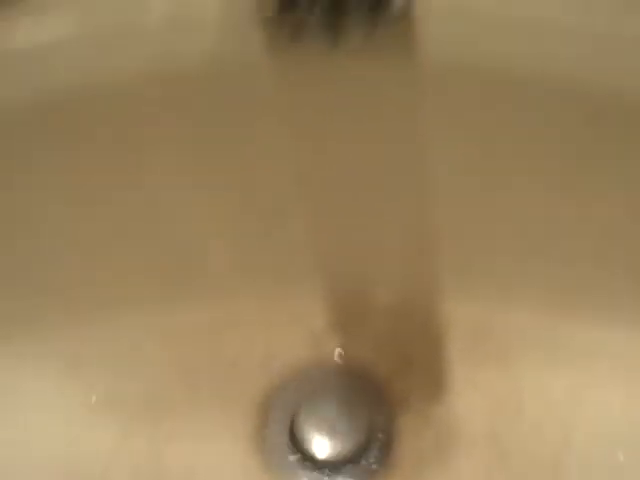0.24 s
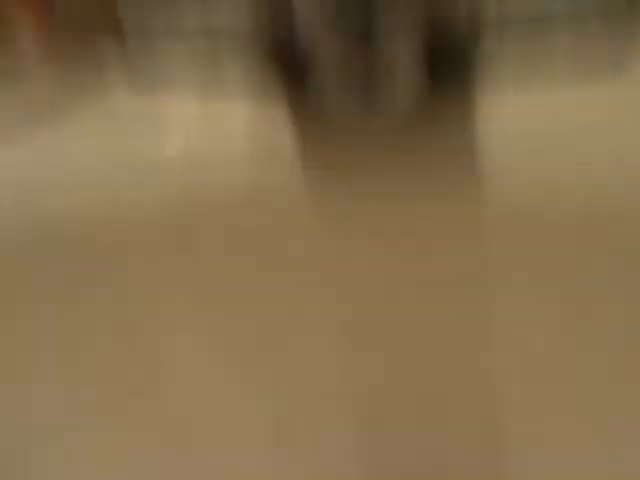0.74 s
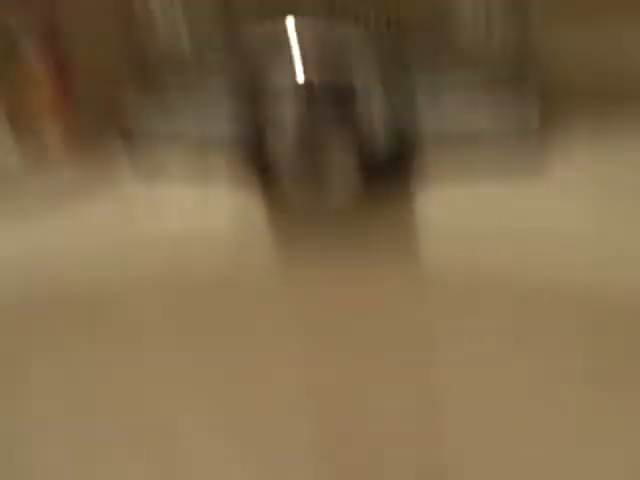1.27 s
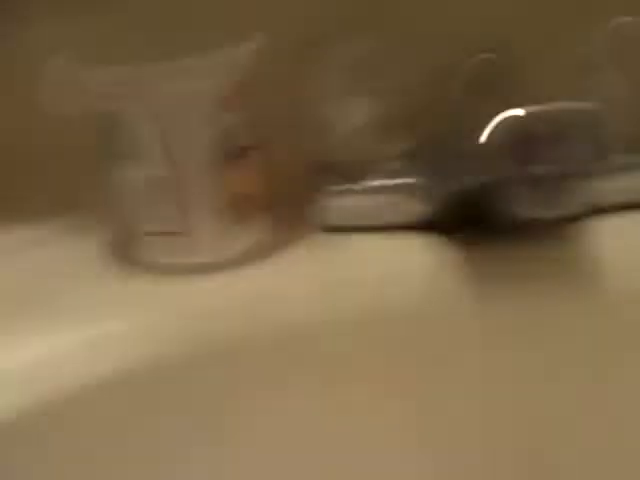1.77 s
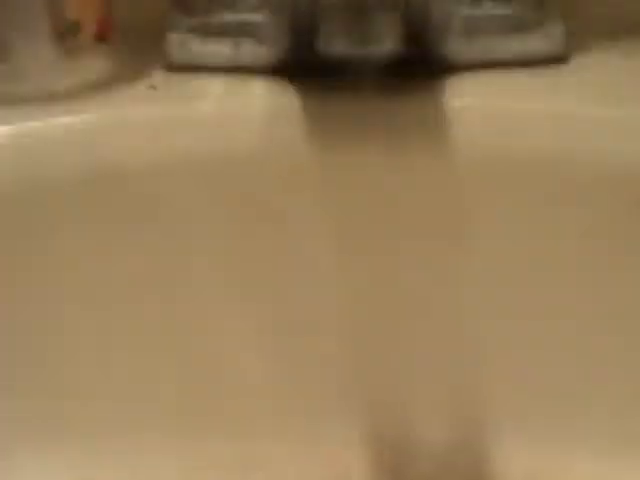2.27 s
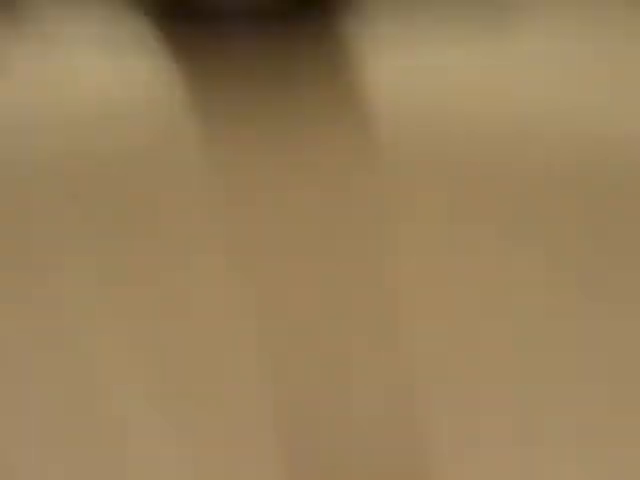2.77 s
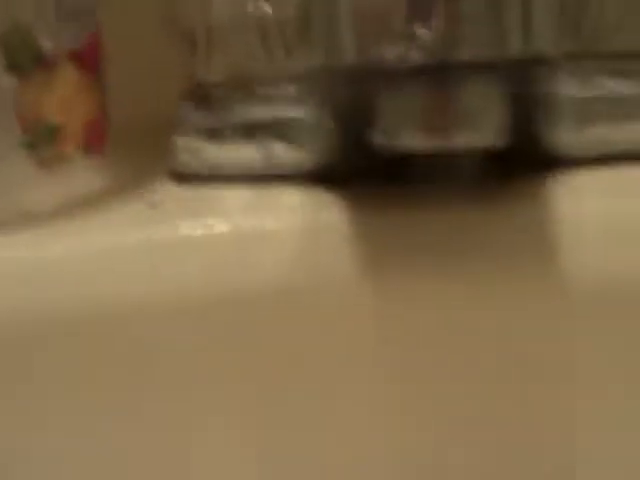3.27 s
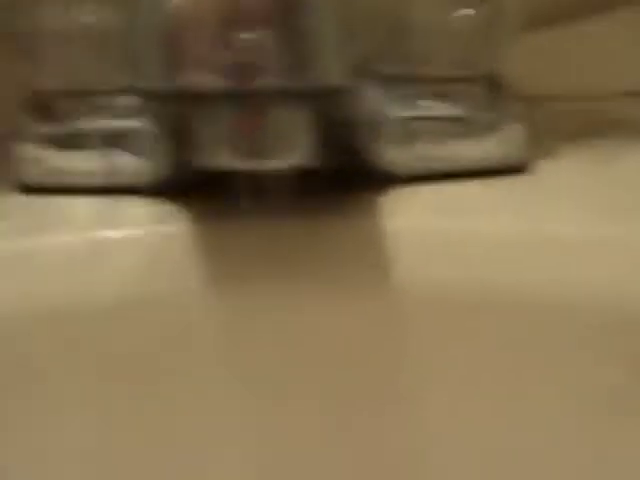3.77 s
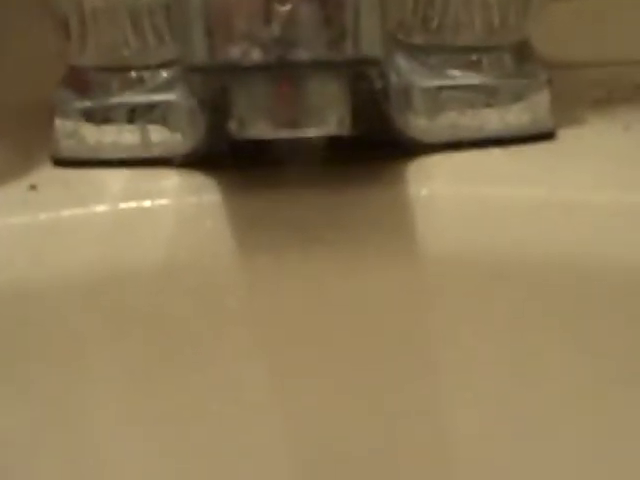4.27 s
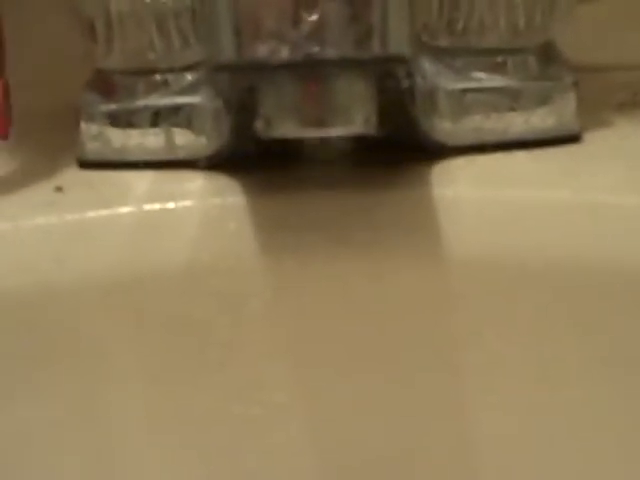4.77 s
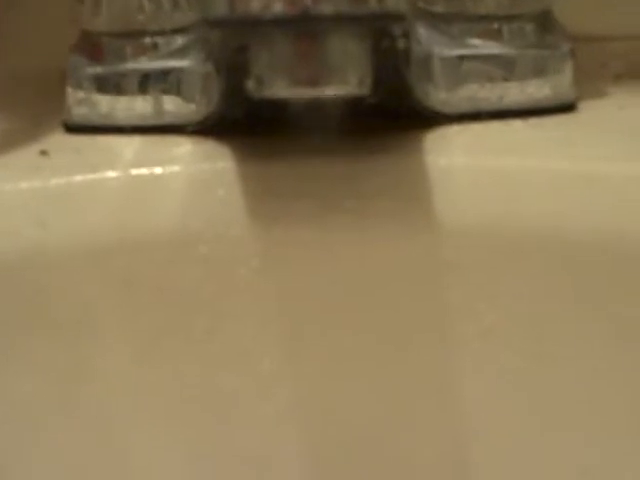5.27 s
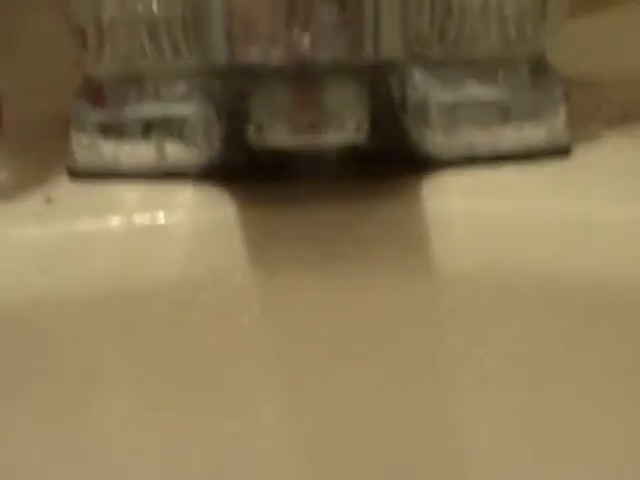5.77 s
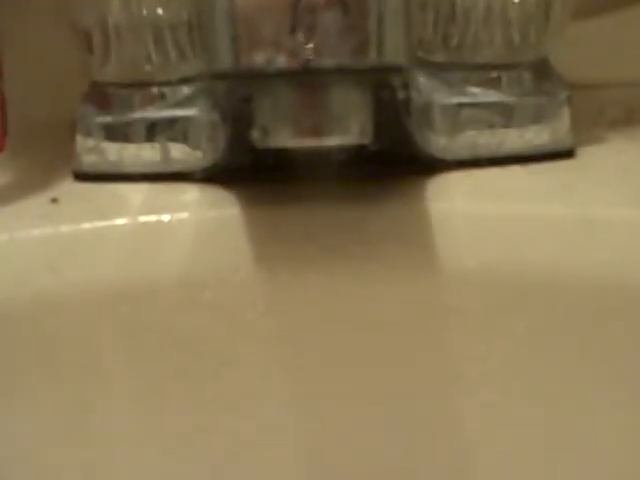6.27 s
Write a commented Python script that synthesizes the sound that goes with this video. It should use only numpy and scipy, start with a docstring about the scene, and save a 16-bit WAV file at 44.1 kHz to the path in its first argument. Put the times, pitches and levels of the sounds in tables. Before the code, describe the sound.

A bathroom tap blows air over a bare basin, close to a small hand-held microphone, for about 6.5 seconds. A loud, bright, wide hiss is already running at the start, fluttering unevenly, with a faint hollow ring like a short pipe and a thin singing from the bowl that fades by 0.8 s. Tiny slugs of water spit as sharp, very short noisy bursts, densest from 0.2 to 1.7 s. The hiss changes colour in sliding, slightly phasing sweeps as the microphone moves. Around 1.75 s it suddenly drops and dulls, then climbs back by about 2.1 s, with more spits up to 3.2 s. Soft low handling thumps occur near 1, 1.4 and 1.9 s. From about 4 s the tone holds nearly still: a smoother, steady, crisp hiss with scattered light spits, continuing to the end without stopping.

```python
"""In a bathroom, air blows out of a tap over a bare basin, close to a small hand-held camera with one microphone.
The jet is filtered noise that hisses and flutters; noise through resonance peaks makes the spout ring like a
short pipe and the bowl sing. Slugs of water spit as short noise bursts. Echoes off the tap and porcelain
draw combs that slide as the camera moves, and the hand adds a faint rumble of slow random pressure."""
import sys
import numpy as np
from scipy import signal
from scipy.fft import rfft, irfft
from scipy.io import wavfile
from scipy.ndimage import uniform_filter1d

SR = 44100
rng = np.random.default_rng(int(sys.argv[2]) if len(sys.argv) > 2 else 0)


def store_pcm(level_fs):
    """Save levels as 16-bit WAV."""
    pcm = np.round(np.clip(level_fs, -1, 1) * 32767).astype(np.int16)
    wavfile.write(sys.argv[1], SR, np.atleast_2d(pcm).T)


N = 287973

# strength and tone of the air jet: (time [s], level before flutter [dB], brightness from 1500 Hz up to 8000 Hz [dB per octave])
FLOW = [(0, -15.5, -0.5), (.3, -16.5, -.5), (.55, -16, -1.3), (1, -15, 0.5), (1.25, -16, -1.1),
        (1.73, -18.5, -0.55), (1.77, -23, -2.2), (1.91, -21.5, -1), (2.05, -18.5, -2), (2.25, -19.5, -1),
        (2.45, -18, -1.5), (2.7, -17, -0.1), (2.95, -17.5, -.6), (3.17, -17.5, 0.4), (3.25, -19.5, -.4),
        (3.55, -18.5, 0), (4.07, -17.5, -0.23), (6.53, -17.5, -0.45)]
# resonances of the air column in the spout: (pitch [Hz], width at half height [Hz], relative level [dB])
SPOUT_MODES = [(394, 97, -1), (1232, 250, 0.5), (2140, 240, -6), (3160, 270, -9.5), (3540, 81, -1)]


def amp(db):
    """Turns decibels into a factor on the sound pressure."""
    return 10 ** (np.asarray(db) / 20)


def evened(x):
    """Scales a signal to an rms of 1."""
    return x / np.sqrt(np.mean(x ** 2) + 1e-20)


def read(points, hz):
    """Reads a (pitch, value) table at any pitch, along a logarithmic pitch scale."""
    f, value = np.transpose(points)
    return np.interp(np.log(hz + 1), np.log(f + 1), value)


def columns(table, t):
    """Reads each column of a table at the times t, in straight lines between its rows."""
    s, *rest = np.transpose(table)
    return [np.interp(t, s, c) for c in rest]


def coloured(x, gain):
    """Filters x by gain(hz, t) on short-time spectra, so the colour can change with time."""
    hz, t, z = signal.stft(x, SR, nperseg=1024, noverlap=768)
    z = z * gain(hz[:, None], t)
    return signal.istft(z, SR, nperseg=1024, noverlap=768)[1][:len(x)]


def wander(lo_hz, hi_hz):
    """Random curve of rms 1 whose speed lies mostly between two rates."""
    hz = np.fft.rfftfreq(N, 1 / SR)
    shape = (hz / lo_hz) / (1 + hz / lo_hz) / (1 + (hz / hi_hz) ** 2)
    return evened(irfft(rfft(rng.standard_normal(N)) * shape, N))


def crackle(per_s, spread_db):
    """Sparse clicks of either sign, a few of them large."""
    size_db = spread_db * np.minimum(rng.exponential(1, N), 4)
    size = amp(size_db) * np.sign(rng.standard_normal(N))
    return evened(size * (rng.random(N) < per_s / SR))


def peaks(modes):
    """Makes a gain curve with one resonance peak for each mode."""
    def gain(hz, t):
        power = 0
        for f, width, db in modes:
            power = power + amp(db) ** 2 / (1 + (2 * (hz - f) / width) ** 2) ** 2
        return np.sqrt(power)
    return gain


def humps_db(table, hz):
    """Adds up smooth bell-shaped humps and dips, in decibels."""
    return sum(db * np.exp(-((hz - f) / width) ** 2 * 2) for f, width, db in table)


def jet_colour(hz, t):
    """Smooth jet spectrum, the humps of the mouth, and a tilt that follows the aim of the camera."""
    # smooth spectrum of the hiss: (pitch [Hz], relative level [dB per Hz])
    hiss = [(15, -23), (25, -13), (140, -10.5), (300, -12), (700, -12), (1600, -12), (2700, -9.5),
            (3950, -9), (5200, -3), (6800, -1.5), (8500, -1), (10600, -0.5), (12300, 0), (14000, 1.5),
            (15800, 1.5)]
    # humps and dips of the aerator and mouth of the tap: (pitch [Hz], width [Hz], height before scaling [dB])
    mouth = [(1610.0, 120.0, 1.1), (2250.0, 340.0, 1.2), (2920.0, 240.0, -1.3), (3240.0, 120.0, 0.8),
             (3960.0, 300.0, -2.9), (4380.0, 150.0, -1.8), (4970.0, 900.0, 0.8), (5380.0, 140.0, 2.4),
             (5900.0, 170.0, -1.0), (6940.0, 120.0, -2.0), (7270.0, 720.0, 1.2), (7590.0, 220.0, -2.3),
             (8450.0, 440.0, -0.9), (8810.0, 300.0, 0.9), (10230.0, 190.0, 2.8), (10430.0, 550.0, -1.6),
             (11290.0, 280.0, -2.2), (12050.0, 900.0, 1.0), (13540.0, 190.0, -0.7), (15300.0, 120.0, -0.8)]
    tilt_db = columns(FLOW, t)[1] * np.log2(np.clip(hz, 1500, 8000) / 8000)
    return amp(read(hiss, hz) + 0.54 * humps_db(mouth, hz) + tilt_db)


def air_jet(jet_db, flutter_db):
    """Turbulent air with bursting droplets; the top of the hiss follows the shared flutter least."""
    air = rng.standard_normal(N) + 0.3 * crackle(per_s=900, spread_db=2.5)
    jet = evened(coloured(air, jet_colour))
    body = signal.sosfiltfilt(signal.butter(2, 9000, fs=SR, output="sos"), jet)
    top = jet - body
    # each part also has a quicker flutter of its own
    body_db = flutter_db + 0.89 * wander(lo_hz=46, hi_hz=150)
    top_db = 0.38 * flutter_db + 0.72 * wander(lo_hz=5.8, hi_hz=100)
    return amp(jet_db) * (body * amp(body_db) + top * amp(top_db))


def spout_ringing(jet_db, wet, flutter_db):
    """Noise and gulps of air ring the spout like a short pipe, a little less as it dries."""
    wet_db, dry_db = -22.5, -28.5  # against the jet, before swell and flutter
    gulps = rng.standard_normal(N) + 0.5 * crackle(per_s=150, spread_db=2.0)
    swell_db = -1.1 * wander(lo_hz=0.5, hi_hz=1.1)
    ringing_db = jet_db + dry_db + (wet_db - dry_db) * wet + swell_db
    return evened(coloured(gulps, peaks(SPOUT_MODES))) * amp(ringing_db + 2.0 * flutter_db)


def bowl_singing(t, flutter_db):
    """Noise through two narrow resonances, strong while the camera looks down into the bowl."""
    # singing bands of the bowl: (pitch [Hz], width at half height [Hz], relative level [dB])
    bands = [(2020, 310, -2), (4210, 96, 0)]
    # strength of the singing: (time [s], level before flutter [dB])
    singing = [(0, -40.5), (.3, -35.5), (.55, -39), (.8, -80), (6.53, -74)]
    level_db = columns(singing, t)[0] + 2.0 * flutter_db
    return evened(coloured(rng.standard_normal(N), peaks(bands))) * amp(level_db)


def tap():
    """Jet, spout and bowl share one flutter, which calms as the pipe dries out."""
    t = np.arange(N) / SR
    drying_s, flutter_wet_db, flutter_dry_db = 3, 1.5, 0.47
    jet_db, wet = columns(FLOW, t)[0], np.exp(-t / drying_s)
    depth_db = flutter_dry_db + (flutter_wet_db - flutter_dry_db) * wet
    flutter_db = depth_db * wander(lo_hz=1.6, hi_hz=44.6)
    jet = air_jet(jet_db, flutter_db)
    return jet + spout_ringing(jet_db, wet, flutter_db) + bowl_singing(t, flutter_db)


def echo_combs(hz, t):
    """Each echo adds a delayed copy, which is a comb whose teeth slide with the delay."""
    # four near surfaces, at a guess: (time [s], delay [ms], strength before the pitch factor [share])
    tap_body = [(0.05, 0.11, 0.27), (.18, 0.1, 0.18), (.57, .112, 0.42), (.75, .107, 0.2),
                (1.05, 0.096, 0.22), (1.2, 0.21, 0), (1.35, 0.16, 0.13), (1.5, 0.15, 0.27),
                (1.74, .136, 0.13), (1.87, 0.16, .01), (2.13, 0.14, 0.27), (2.45, .15, 0.31),
                (2.7, 0.171, 0.27), (2.9, 0.19, .02), (3.1, .11, 0.1), (3.45, 0.11, .18), (4.1, 0.11, 0.14),
                (6.4, 0.11, 0.13)]
    basin_floor = [(.2, 1.25, .03), (.57, 0.97, 0.07), (1, 1.02, 0.064), (1.25, .99, 0.11),
                   (1.4, 0.91, .04), (1.74, 1.026, .03), (2.2, 1.046, .09), (2.7, 0.96, 0.064),
                   (2.91, .958, 0.074), (3.5, 0.96, .1), (4.1, .97, 0.1), (6.4, .96, .09)]
    basin_wall = [(.05, 0.69, 0.067), (.44, 0.55, 0.068), (1.22, 0.52, .1), (1.35, 0.29, .04),
                  (1.65, 0.29, 0.16), (1.8, 0.3, 0.042), (1.92, 0.28, 0.044), (2.15, 0.3, 0.16),
                  (2.45, 0.307, 0.11), (2.78, 0.37, .03), (2.95, 0.52, .05), (3.45, 0.5, 0.056),
                  (4.1, 0.53, 0.042), (6.4, 0.54, 0.034)]
    far_rim = [(.05, 1, .07), (.7, 1.5, .02), (1.74, 1.25, .05), (2.65, 1.5, .06), (2.78, 1.483, .06),
               (3.2, 1.56, 0.027), (4.4, 1.38, 0.064), (6.4, 1.6, 0.061)]
    # how well each surface throws back each pitch:
    # (pitch [Hz], tap body [factor], basin floor [factor], basin wall [factor], far rim [factor])
    mirror_table = [(1640, 0.1, 0.1, 0.11, 0.32), (4020, 0.2, 0.064, 2.8, 0.1), (7200, 1.56, 3.8, 0.2, 1.7),
                    (10000.0, 1.04, 2.3, 1.8, 0.9), (13000.0, 0.64, 0.1, 1.2, 0.1),
                    (15700.0, 1.7, 0.1, 0.87, 2.0)]
    at_hz, *mirrors = np.transpose(mirror_table)
    comb = 1
    for path, mirror in zip([tap_body, basin_floor, basin_wall, far_rim], mirrors):
        ms, strength = columns(path, t)
        echo = np.clip(strength * read(np.transpose([at_hz, mirror]), hz), 0, 0.9)
        comb = comb * (1 + echo * np.exp(-2j * np.pi * hz * ms / 1000))
    return comb


def surfaces(hz, t):
    """Echo combs, plus patches of colour that change as the camera swings and comes to rest."""
    # how much the camera moves: (time [s], movement [share 0-1])
    swing_table = [(0, .8), (2.8, .8), (3.05, .5), (3.8, .5), (4.25, .15), (6.53, .15)]
    # a broad patch that wanders through the hiss: (time [s], pitch [Hz], height [dB])
    glint = [(0, 5300, 6.5), (.3, 5270, 2), (.55, 7700, 2.5), (.85, 8300, 2), (1.05, 4400, 0.5),
             (1.25, 4800, 3.5), (1.5, 5470, 3.5), (1.7, 6400, -1), (1.8, 14800, -2), (2.2, 15100, 2),
             (2.65, 12600, 0), (3, 11800, 1)]
    # narrow bands of the camera at rest in front of the tap: (pitch [Hz], width [Hz], height at full rest [dB])
    resting = [(3670, 130, 2.5), (5370, 130, 2), (5750, 200, -1.5), (6370, 110, -5), (6900, 180, -4),
               (7250, 250, 2.5), (7620, 170, -4), (8250, 350, 1), (8900, 200, -4.5), (10250, 120, 2),
               (10600, 350, -1.5), (11620, 150, -3.5), (12000, 350, 1.5), (13200, 320, 2)]
    comb = echo_combs(hz, t)
    # many fainter echoes: narrow patches of colour that drift while the camera moves
    patches = rng.standard_normal((len(t), len(hz))).T
    for _ in range(2):
        patches = uniform_filter1d(patches, size=4, axis=0)  # blur over pitch
        patches = uniform_filter1d(patches, size=40, axis=1)  # blur over time
    glint_hz, height_db = columns(glint, t)
    glint_db = humps_db([(glint_hz, 1800, height_db)], hz)
    swing = columns(swing_table, t)[0]
    resting_db = (1 - swing) * humps_db(resting, hz)
    patches_db = 1.96 * swing * evened(patches) * (hz > 1500)
    return comb * amp(glint_db + resting_db + patches_db)


def hand():
    """Slow pressure lumps from the grip on the camera, with a little rubbing above them."""
    # shifts of the grip: (time [s], level at the middle [dB], length [s], rubbing [share of the shift])
    grip = [(.45, -42, .2, 0.86), (.72, -45, .1, .3), (1.027, -36.5, 0.21, 0.47), (1.44, -41, .08, 0.18),
            (1.9, -34, 0.14, 0.088), (2.11, -48, .04, 2.5), (2.46, -44, 0.088, 0.15), (2.77, -40, 0.1, .15),
            (4.543, -44, 0.16, .3)]
    tremor_db = -54
    t = np.arange(N) / SR
    shifts = np.array([amp(db) * np.exp(-(2 * (t - s) / length) ** 2) for s, db, length, _ in grip])
    rubbing = np.transpose(grip)[-1] @ shifts
    lumps = (amp(tremor_db) + shifts.sum(axis=0)) * wander(lo_hz=5, hi_hz=25)
    return lumps + rubbing * wander(lo_hz=90, hi_hz=120)


def spits():
    """Each slug of water bursts as noise: sharp start, quick fall; its lower part rings the spout."""
    # slugs bursting at the mouth: (time [s], level of the burst [dB], ring of the spout against it [dB])
    slugs = [(0.213, -24, -8), (0.375, -20, -25), (0.484, -16, -8), (0.632, -22.5, -3), (0.722, -25, -10),
             (0.772, -22, -6), (0.807, -16.5, -13.5), (0.898, -18.5, -5.5), (0.976, -21, -9),
             (1.083, -21.5, -5), (1.119, -17, -15), (1.297, -19.5, -27), (1.458, -23.5, -16),
             (1.531, -19.5, -24), (1.688, -23, -6), (2.081, -24.5, -10), (2.136, -21, -17),
             (2.356, -18, -9), (2.402, -21.5, -16), (2.633, -22.5, -7.5), (2.658, -16, -25),
             (2.702, -27, -18), (2.836, -24, -12), (2.954, -20.5, -14), (3.12, -20.5, -17),
             (3.149, -24, -10), (3.178, -21.5, -7.5), (3.558, -21, -10), (3.754, -22, -15),
             (4.353, -23.5, -4.5), (4.665, -23.5, -18), (4.682, -23, -6), (4.887, -23.5, -5.5),
             (5.266, -21, -21), (5.308, -19.5, -14), (5.766, -30, -10), (5.877, -24, -7),
             (6.151, -25.5, -8), (6.257, -20.5, -14.5), (6.289, -22, -11), (6.495, -24.5, -15)]
    # colour of the spray: (pitch [Hz], relative level [dB per Hz])
    spray_colour = [(200, -34), (1200, -10), (3500, -1), (5500, 4.5), (9000, 3), (15600, -18)]
    t = np.arange(2000) / SR
    bright, low = np.zeros(N + len(t)), np.zeros(N + len(t))
    pop_and_spray = 1.65 * np.exp(-t / 0.00077) + np.exp(-t / 0.008)
    shape = (1 - np.exp(-t / 0.00048)) * pop_and_spray
    # twelve small ones at chance times, -33 to -27 dB
    small = [(a * N / SR, np.interp(b, (0, 1), (-33, -27)), -14) for a, b in rng.random((12, 2))]
    for s, burst_db, ring_db in slugs + small:
        start = round(s * SR)
        at = slice(start, start + len(t))
        bright[at] += shape * amp(burst_db)
        low[at] += shape * amp(burst_db + ring_db)
    spray = evened(coloured(rng.standard_normal(N), lambda hz, t: amp(read(spray_colour, hz))))
    ring = evened(coloured(rng.standard_normal(N), peaks(SPOUT_MODES)))
    return bright[:N] * spray + low[:N] * ring


def scene():
    """Tap and spits pass by the echoing surfaces; the hand acts directly; both channels are alike."""
    mono = coloured(tap() + spits(), surfaces) + hand()
    return np.array([mono, mono])


def record(dry):
    """Colour of the microphone, then the band limit of the recorder."""
    # treble lift of the small microphone: (pitch [Hz], lift [dB])
    capsule = [(10500, 0), (12500, 2), (15800, 3)]
    edge_hz = 15700
    heard = np.array([coloured(x, lambda hz, t: amp(read(capsule, hz))) for x in dry])
    low_pass = signal.firwin(1023, edge_hz, window=("kaiser", 10), fs=SR)
    return signal.oaconvolve(heard, low_pass[None], "same")


dry = scene()
out = record(dry)
store_pcm(out)
```